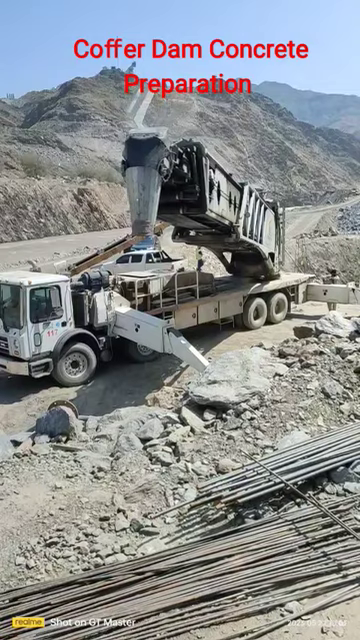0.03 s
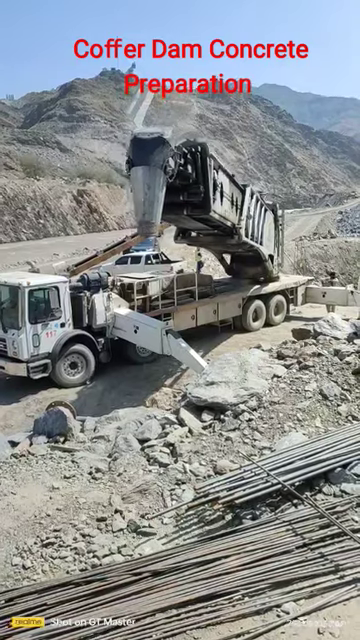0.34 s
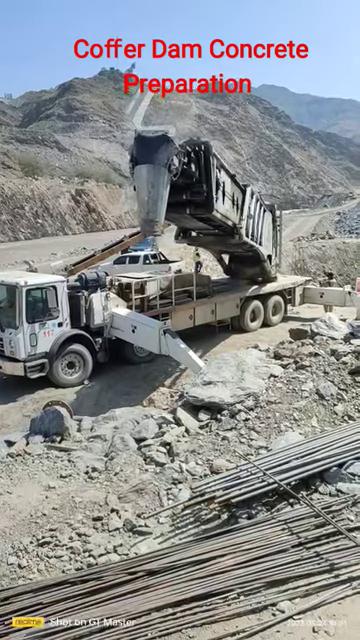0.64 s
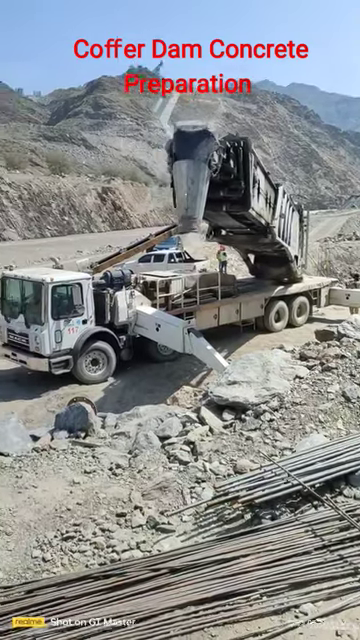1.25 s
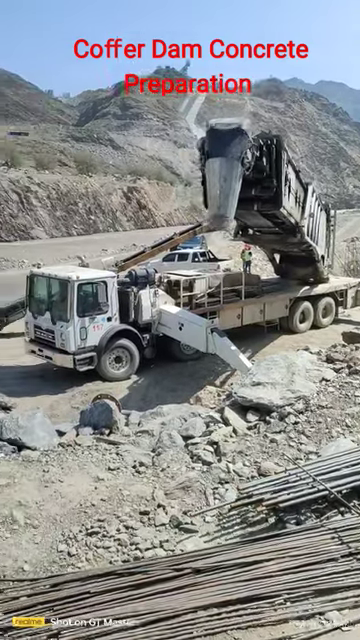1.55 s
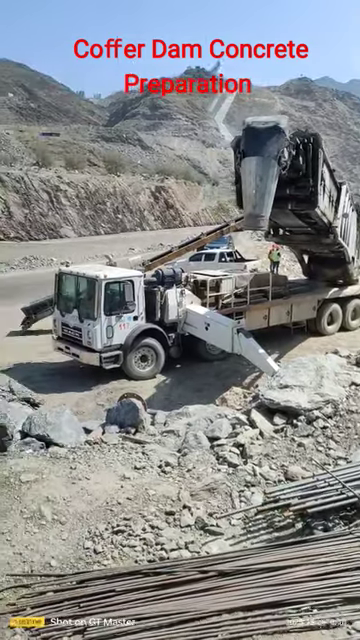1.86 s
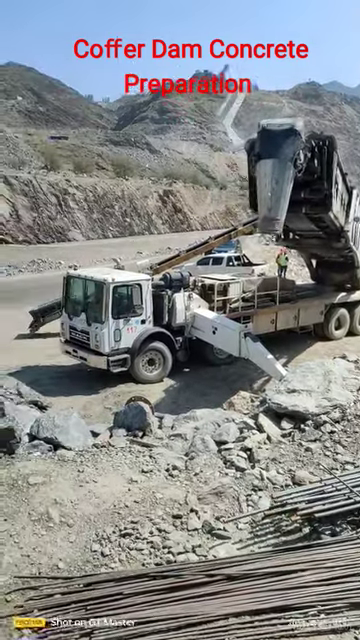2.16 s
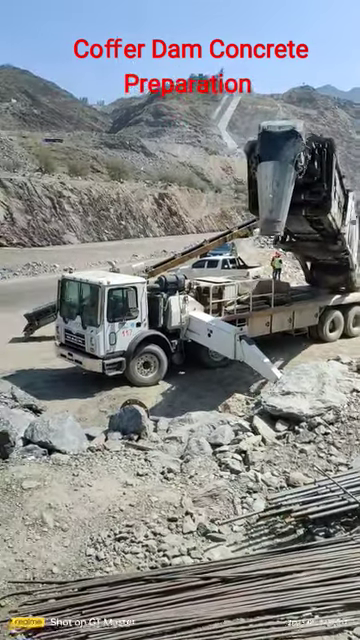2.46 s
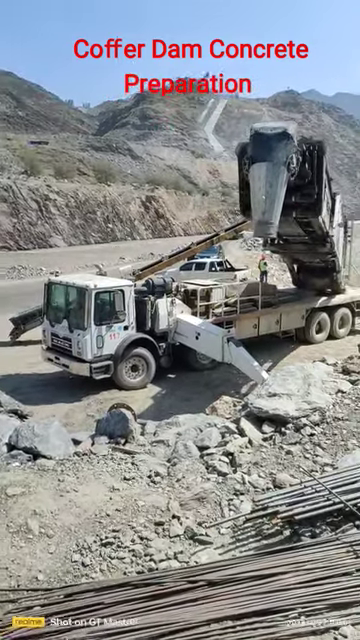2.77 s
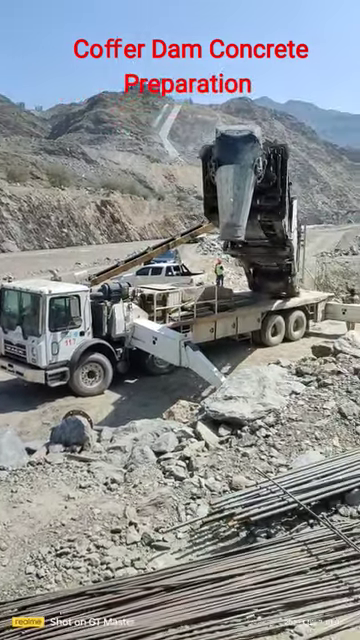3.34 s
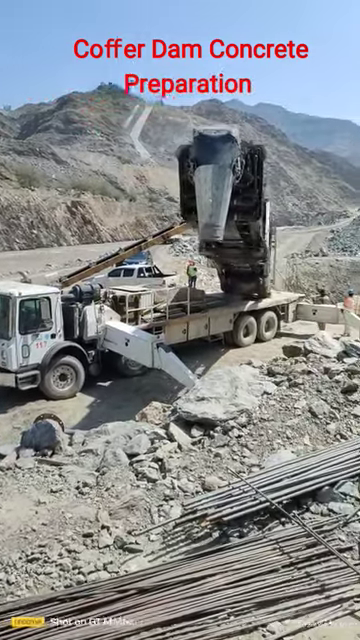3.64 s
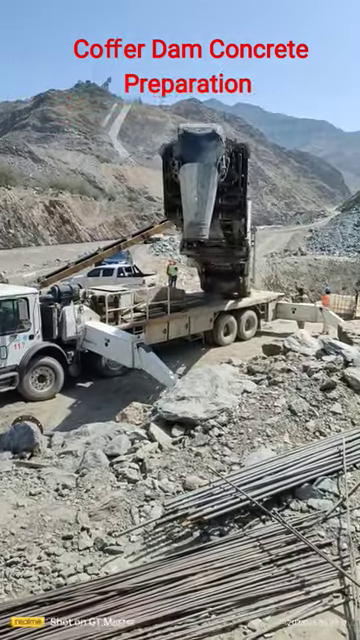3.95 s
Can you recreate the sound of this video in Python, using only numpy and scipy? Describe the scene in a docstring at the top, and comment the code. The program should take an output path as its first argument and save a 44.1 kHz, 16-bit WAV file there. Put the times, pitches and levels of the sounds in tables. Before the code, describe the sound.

Steady diesel engine drone and knocking, with a whining hydraulic pump and light wind.

```python
"""A six-cylinder diesel drones at a steady speed, fading in quickly: a conveyor truck on a building site.
Its block clatters, pistons knock and injectors tick in a pattern that repeats every engine cycle,
with fan hiss and sizzling loose metal on top. A hydraulic pump whines and its oil rushes under load,
until a valve shuts with a short squeal and the engine eases. Something small clicks once near the start,
and light wind rumbles on the microphones."""
import sys
import numpy as np
from scipy import signal
from scipy.fft import rfft, irfft
from scipy.io import wavfile

SR = 44100
rng = np.random.default_rng(int(sys.argv[2]) if len(sys.argv) > 2 else 0)


def dump(signal):
    """Clip the signal to [-1, 1] and save it as 16-bit WAV at the path in sys.argv[1]."""
    limited = np.clip(np.atleast_2d(signal).T, -1, 1)
    pcm = np.round(limited * 32767).astype(np.int16)
    wavfile.write(sys.argv[1], SR, pcm)


N = 176400
T = np.arange(N) / SR
CYCLE_HZ, CYLINDERS = 9.908, 6   # every cylinder fires once a cycle
WOBBLE_S = .00006   # timing unevenness of crank and fan


def from_db(db):
    """Decibels to gain."""
    return 10 ** (np.asarray(db) / 20)


def unit_rms(x):
    """Scale to rms 1."""
    return x / np.sqrt(np.mean(x ** 2) + 1e-20)


def in_time(rows):
    """A control curve at every sample."""
    return np.interp(T, *np.transpose(rows))


def at_hz(rows):
    """A spectrum table at every frequency bin."""
    hz, value = np.transpose(rows)
    return np.interp(np.log(np.arange(N // 2 + 1) * SR / N + 1e-3), np.log(hz), value)


def drift(corner_hz):
    """Slow random motion of rms 1."""
    hz = np.arange(N // 2 + 1) * SR / N
    return unit_rms(irfft(rfft(rng.standard_normal(N)) / (1 + (hz / corner_hz) ** 2), N))


def pan(db):
    """Stereo gains that put left this far above right."""
    return from_db(np.array([[.5], [-.5]]) * db)


def white():
    """Two unrelated white noises."""
    return rng.standard_normal((2, N))


def tone(turns):
    """A sine of rms 1 with a random starting phase."""
    return np.sqrt(2) * np.sin(2 * np.pi * (turns + rng.random()))


# Likeness of left and right: f/Hz, correlation (capped at 0.99 in use)
LIKENESS = [(30, 0.5), (60, 0), (130, 1.1), (300, 0.46), (700, 1), (1300, .79), (2000, 0.5), (2600, 0.7),
            (3500, 0.44), (4700, 0.32), (5800, 0.16), (14000, 0)]
# Stereo balance: f/Hz, left over right/dB
BALANCE = [(60, -1.2), (200, -3.5), (370, -4.2), (680, 0), (1260, -3.7), (2300, -4.5), (3500, -2.5),
           (5000, -1.3), (8000, -1.8), (11000, -3.5), (13000, -6.5)]
# Phase lead of the left side: f/Hz, lead/rad
LEFT_LEAD = [(300, 0), (520, 0.8), (780, -0.9), (1200, -0.66), (1550, 0.5), (2200, 0.94), (3100, 3),
             (4400, 6.5)]
def spread(pair, spectrum):
    """Colour two unrelated signals and spread them in stereo; rms 1, so the spectrum sets only the shape."""
    alike = np.clip(at_hz(LIKENESS), -.99, .99)
    mid, side = rfft(pair) * from_db(at_hz(spectrum))
    mid, side = np.sqrt(1 + alike) * mid, np.sqrt(1 - alike) * side
    left, right = np.array([mid + side, mid - side]) * pan(at_hz(BALANCE))
    return unit_rms(irfft(np.array([left * np.exp(1j * at_hz(LEFT_LEAD)), right]), N))


# Wind rumble colour: f/Hz, relative level/dB
WIND_COLOUR = [(10, -5), (24, 10), (34, 14), (50, 8), (85, 2), (160, 0), (400, -44), (2000, -100)]
# Gust envelope: t/s, level/dB
GUSTS = [(.2, -26), (.45, -31), (.55, -34), (.7, -31.5), (.95, -38), (1.12, -35), (1.24, -31), (1.42, -36),
         (1.62, -31.5), (1.85, -29.5), (2.05, -33), (2.25, -32.5), (2.45, -31), (2.7, -34), (3.1, -36.5),
         (4, -35)]
def wind():
    """Light gusts rumble, buffeting each microphone in its own way."""
    buffet_db = 3.5 * np.array([drift(4.6), drift(9.1)])
    return from_db(in_time(GUSTS) + buffet_db) * spread(white(), WIND_COLOUR)


# Colour of the click's grit: f/Hz, relative level/dB
CLICK_COLOUR = [(1500, -27), (2400, -2), (2700, 13), (3200, 6), (6500, -19), (8000, -12), (10000, -9.5),
                (14000, -29)]
def click(at_s=.293, decay_s=.002, clink_hz=2750, ring_s=.004):
    """One small gritty click with a short metallic clink."""
    since_s = np.maximum(T - at_s, 0)
    age, ring_age = since_s / decay_s, since_s / ring_s
    grit = from_db(-32) * age * np.exp(1 - age) * spread(white(), CLICK_COLOUR)
    clink = from_db(-36) * ring_age * np.exp(1 - ring_age) * tone(clink_hz * T)
    return grit + clink


# Modes of the loose metal: f/Hz, relative level/dB
METAL_MODES = [(1892, 4.5), (1948, 9), (2070, 4), (2140, 5), (2610, -2), (3250, -1.5), (3760, -2),
               (4080, -2.5), (4780, -4), (4950, -3), (5500, -5), (6680, -8.5)]
def sizzle(touches_per_s=90, ring_s=.008):
    """Loose metal parts touch at random; each mode rings briefly from its own contacts."""
    out, decay = 0, np.exp(-1 / (ring_s * SR))
    for hz, db in METAL_MODES:
        touches = (rng.random(N) < touches_per_s / SR) * white()
        step = 2 * np.pi * hz / SR
        ring = signal.lfilter([0, np.sin(step)], [1, -2 * decay * np.cos(step), decay ** 2], touches + 1e-18)
        out = out + from_db(db) * pan(np.interp(hz, *np.transpose(BALANCE))) * ring
    return from_db(-46.3) * unit_rms(out)


# Fan and air hiss colour: f/Hz, relative level/dB
HISS_COLOUR = [(400, 3.5), (2000, -6.5), (2900, 0), (3800, -1), (5000, -2), (6800, -4.5), (7500, -12),
               (8200, -22), (9300, -15.5), (12000, -17), (14000, -27)]
def air_hiss(push):
    """The fan's air hisses, flickering and pulsing slightly with each firing."""
    return from_db(-44.5 + drift(21)) * spread(white() * (1 + .1 * push), HISS_COLOUR)


def fan(effort, blade_hz=260.4):
    """A blade tone, probably the cooling fan's, beats against the engine's own tones."""
    turns = blade_hz * (T + WOBBLE_S * drift(6))
    return pan(-2.5) * effort * from_db(-38 + 1.56 * drift(6.5)) * tone(turns)


# Rushing oil colour: f/Hz, relative level/dB
OIL_COLOUR = [(100, -4.5), (270, 8), (420, -8.5), (750, 1.5), (1000, -6.5), (1400, 1.5), (1700, -10),
              (2200, -6), (2900, -11), (4500, -13.5), (7000, -18.5), (8200, -34.5), (10500, -28),
              (14000, -34.5)]
# Oil envelope under load: t/s, level/dB
OIL_LEVEL = [(.2, -35), (.5, -32.5), (.85, -31.5), (.95, -35.5), (1.35, -36.5)]
def oil_rush(load):
    """Hydraulic oil rushes under load and stops as the valve shuts."""
    return load * from_db(in_time(OIL_LEVEL)) * spread(white(), OIL_COLOUR)


HYDRAULICS_PAN_DB = -3.5
def valve_squeal(at_s=1.255, length_s=.155, start_hz=860, sag_hz_per_s=170):
    """The closing valve sings briefly, sagging in pitch."""
    age_s = np.clip(T - at_s, 0, length_s)
    turns = np.cumsum(start_hz - sag_hz_per_s * age_s + 6 * drift(40)) / SR
    return pan(HYDRAULICS_PAN_DB) * from_db(-33.5) * np.sin(np.pi * age_s / length_s) * tone(turns)


# Piston rate of the pump: t/s, f/Hz
PUMP_RATE = [(0, 184.8), (.75, 184.8), (1.0, 184.4), (1.65, 184.4), (2.1, 182.8), (2.7, 181.7),
             (3.2, 181.6), (3.55, 180.5), (3.9, 182)]
# Pump partials that follow the load: multiple of the piston rate, loaded level/dB, relieved level/dB
PUMP_PARTIALS = [(1, -33, -37), (3, -46, -57.5), (8, -46.5, -51), (9, -57, -54)]
# Second partial, a hum that sinks for a while as the valve shuts: t/s, level/dB
HUM_LEVEL = [(.4, -40), (1.15, -38.5), (1.4, -48), (2.0, -51), (2.3, -40.5), (3.9, -45)]
# Fifth partial, a whine that is loudest under load: t/s, level/dB
WHINE_LEVEL = [(.35, -46), (.43, -35.5), (.58, -33.5), (.67, -42), (.73, -38), (.85, -33), (.92, -36),
               (1.04, -33.5), (1.36, -34), (1.44, -44), (1.62, -47.5), (1.92, -46), (2.08, -47), (2.3, -58),
               (3.85, -47)]
def pump(load, swell_at_s=2.97, swell_width_s=.44):
    """The hydraulic pump's pistons make a throbbing hum and a rough whine, softer once relieved."""
    rate_hz = in_time(PUMP_RATE)
    jitter_s = .00003 * drift(8.1)
    turns = np.cumsum(rate_hz) / SR + jitter_s * rate_hz
    hum = 0
    for multiple, loaded_db, relieved_db in PUMP_PARTIALS:
        db = load * loaded_db + (1 - load) * relieved_db + .9 * drift(1)
        hum = hum + from_db(db) * tone(round(multiple) * turns)
    hum = hum + from_db(in_time(HUM_LEVEL)) * tone(2 * turns)
    swell = from_db(-39.5) * np.exp(-((T - swell_at_s) / swell_width_s) ** 2)
    whine = from_db(in_time(WHINE_LEVEL)) * tone(5 * turns) + swell * tone(6 * turns)
    throb, roughness = 1 + .13 * drift(20), 1 + .17 * drift(22)
    return pan(HYDRAULICS_PAN_DB) * (throb * hum + roughness * whine)


def block_ring(cycles, contacts, hz, ring_s, rough):
    """Uneven contacts in each cycle ring one resonance of the block, partly clean and partly rough."""
    blows = 0
    for place, db in contacts:
        age = (cycles - place) % 1 / CYCLE_HZ / ring_s
        blows = blows + from_db(db) * age * np.exp(-age)
    clean = pan(np.interp(hz, *np.transpose(BALANCE))) * tone(round(hz / CYCLE_HZ) * cycles)
    strength = from_db(2 * drift(6.5))   # no two blows are equally hard
    band = signal.butter(2, [.78 * hz, 1.22 * hz], "band", fs=SR, output="sos")
    grit = spread(signal.sosfilt(band, white()), BLOCK_COLOUR)
    return unit_rms(strength * blows * (clean + rough * grit))


# Injector rhythm: place in the cycle/0-1, relative level/dB
TICKS = [(0.13, -0.5), (.34, 0), (.52, 2), (.71, 2), (.945, -2)]
def injectors(cycles):
    """The injectors tick lightly on a high resonance of the block."""
    return from_db(-47.5) * block_ring(cycles, TICKS, hz=1960, ring_s=.0045, rough=.75)


# Piston knock rhythm: place in the cycle/0-1, relative level/dB
KNOCKS = [(.1, -7), (.21, -7), (.325, -3), (.495, -1.5), (.578, -3.5), (.655, -8), (.812, 1), (.86, -9),
          (.895, -2)]
def pistons(cycles, load, extra_load_db=1.5):
    """The pistons knock on the block, gaining more under load than the rest of the engine."""
    gain = from_db(-41.5 + extra_load_db * load)
    return gain * block_ring(cycles, KNOCKS, hz=1338, ring_s=.003, rough=.8)


def firings(cycles, first_place=.17, decay_s=.0017):
    """A quickly dying push each time a cylinder fires."""
    since_s = ((cycles - first_place) * CYLINDERS % 1) / (CYLINDERS * CYCLE_HZ)
    return np.exp(-since_s / decay_s)


def rattle(cycles, repeat_share=.49):
    """Contact noise, a share of whose power comes back alike in each engine cycle."""
    size = int(SR / CYCLE_HZ)
    one_cycle = irfft(np.exp(2j * np.pi * rng.random((2, size // 2 + 1))), size)
    looped = np.array([np.interp(cycles * size, np.arange(size), side, period=size) for side in one_cycle])
    return np.sqrt(repeat_share) * unit_rms(looped) + np.sqrt(1 - repeat_share) * white()


# Colour of the block's clatter and of the grit in its rings: f/Hz, relative level/dB
BLOCK_COLOUR = [(25, 5), (70, 3), (140, -7), (215, -4), (320, -5), (430, -10.5), (650, -11.5), (850, -5.5),
                (1000, -4.5), (1200, -2.5), (1350, -9), (1600, -17.5), (1780, -14.5), (1980, -12),
                (2250, -13.5), (2800, -22), (5000, -31.5), (9000, -81)]
def clatter(cycles, push, lull_place=.776, lull_width=.035):
    """Valve gear and combustion rattle the block, harder at each firing, with a brief lull once a cycle."""
    lull = 1 - .22 * np.exp(-((cycles % 1 - lull_place) / lull_width) ** 2)
    return from_db(-31) * spread(rattle(cycles) * lull * (1 + .39 * push), BLOCK_COLOUR)


# Exhaust and block tones: multiple of the cycle rate (rounded in use), level/dB, left over right/dB
ENGINE_ORDERS = [(3, -39, -5), (4, -40, -5), (6, -24, -1.5), (12, -37, 0.5), (15, -52, 1), (17, -45, -1),
                 (18, -42, -1), (20, -43.5, -1.5), (23, -53, -1), (27, -46, -4), (29, -42, 0),
                 (30, -43.5, -4.5), (38, -53.5, -1), (51, -56, 4), (66.13, -56.5, 13), (77.8, -50, 5),
                 (87, -52, -3), (130, -52.5, -6), (196, -53.5, -6)]
def drone(cycles, effort):
    """Exhaust and block tones lock to the crank; the firing tone is steadiest, high ones grow with load."""
    out = 0
    for multiple, db, pan_db in ENGINE_ORDERS:
        order = round(multiple)
        waver_db = (1.3 if order == CYLINDERS else 2.1) * drift(5.4)
        boost = effort if order > 24 else 1
        out = out + pan(pan_db) * boost * from_db(db + waver_db) * tone(order * cycles)
    return out


def scene(valve_shuts_s=1.37, valve_takes_s=.023, load_boost_db=2.5):
    """Engine, hydraulics, click and wind together; the shutting valve takes the load off."""
    cycles = CYCLE_HZ * (T + WOBBLE_S * drift(6.2))
    push = firings(cycles)
    load = np.clip(.5 - (T - valve_shuts_s) / valve_takes_s, 0, 1)
    effort = from_db(load_boost_db * load)
    knocks = pistons(cycles, load) + injectors(cycles)
    engine = drone(cycles, effort) + effort * clatter(cycles, push)
    cooling = air_hiss(push) + fan(effort)
    metal = effort * (knocks + sizzle())
    hydraulics = pump(load) + oil_rush(load) + valve_squeal()
    return engine + cooling + metal + hydraulics + click() + wind()


# Master fade-in, near silence and then a quick rise: t/s, level/dB
FADE_IN = [(0, -74), (.08, -81), (.158, -55), (.163, -13.5), (.2, -11), (.27, -5), (.41, 0)]
def record(dry, cutoff_hz=14300):
    """The mix fades in and a steep low-pass cuts the top."""
    low_pass = signal.ellip(10, .1, 80, cutoff_hz, fs=SR, output="sos")
    return signal.sosfilt(low_pass, dry * from_db(in_time(FADE_IN)))


dry = scene()
out = record(dry)
dump(out)
```